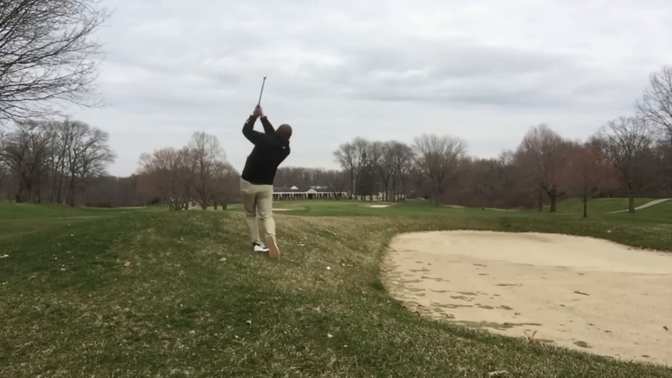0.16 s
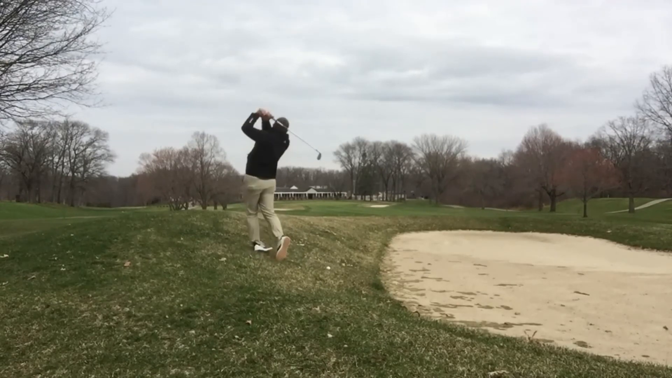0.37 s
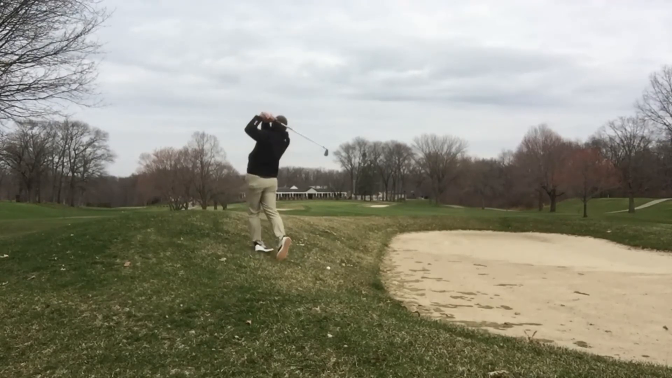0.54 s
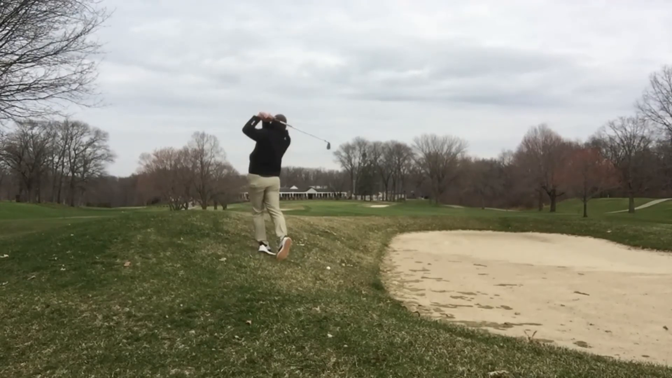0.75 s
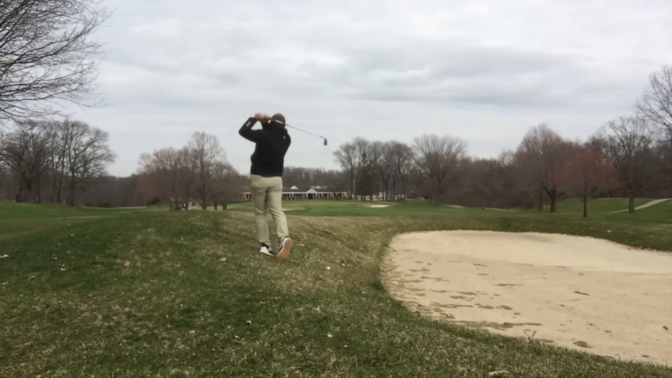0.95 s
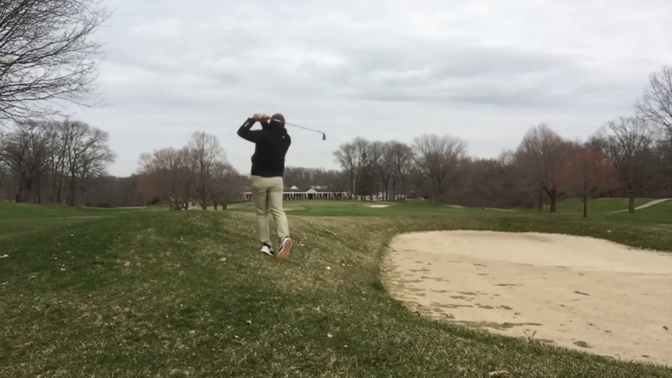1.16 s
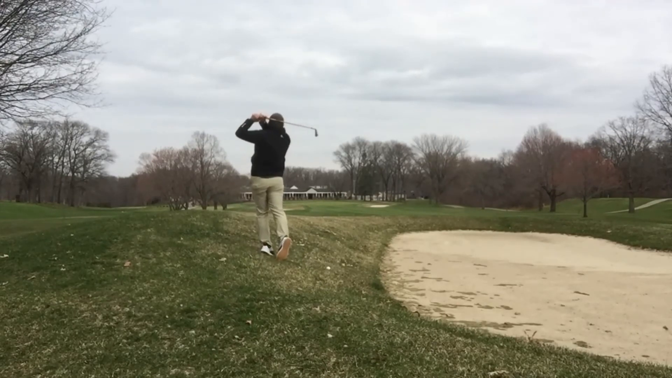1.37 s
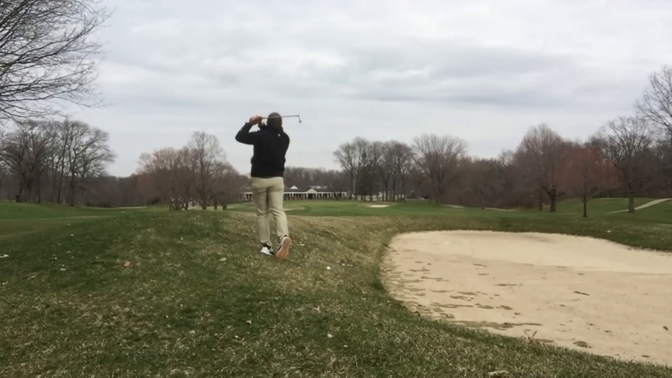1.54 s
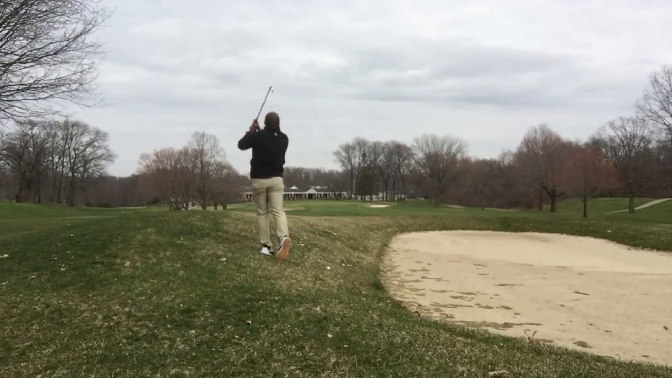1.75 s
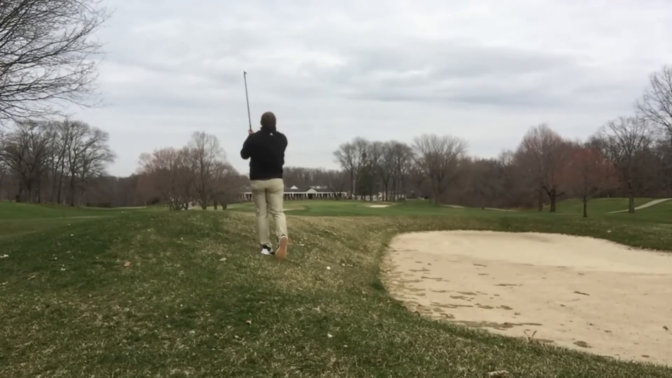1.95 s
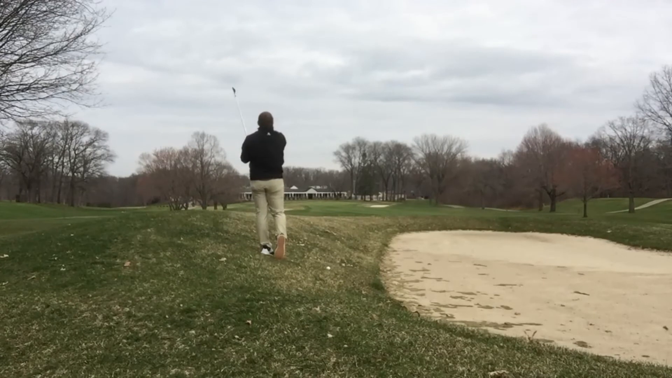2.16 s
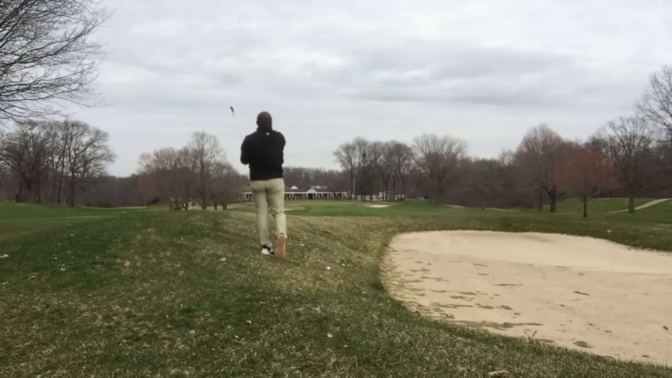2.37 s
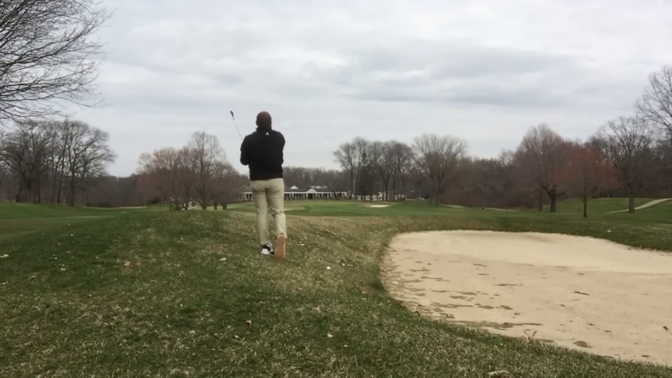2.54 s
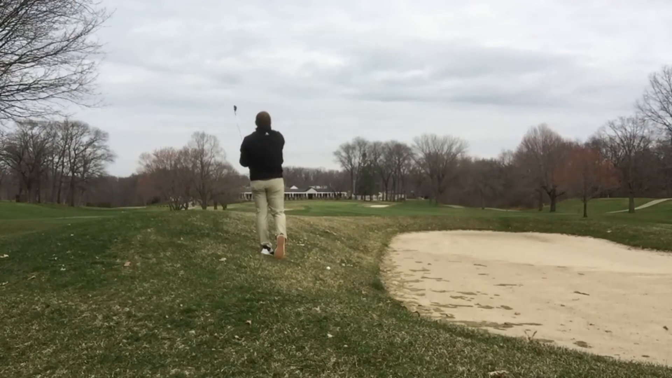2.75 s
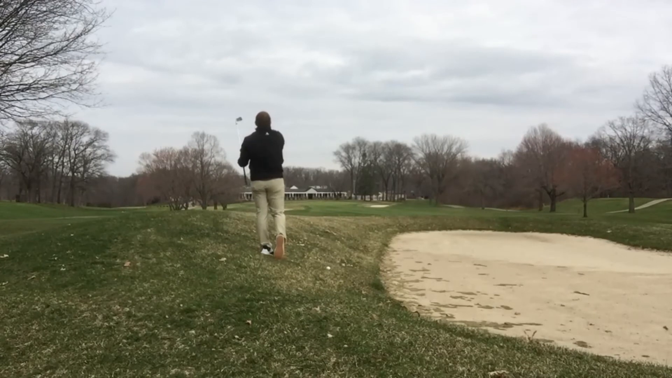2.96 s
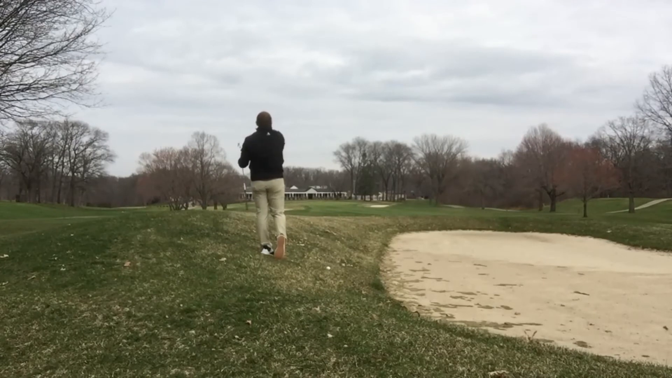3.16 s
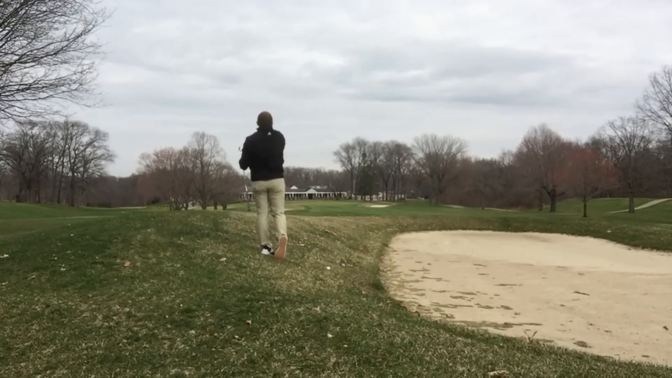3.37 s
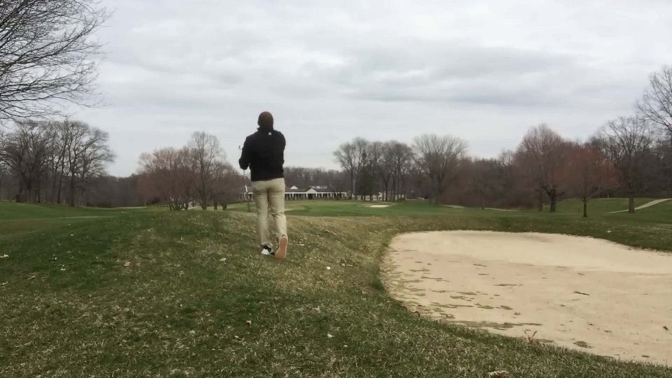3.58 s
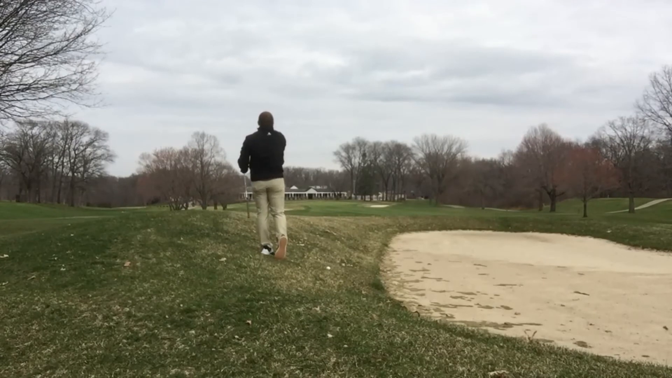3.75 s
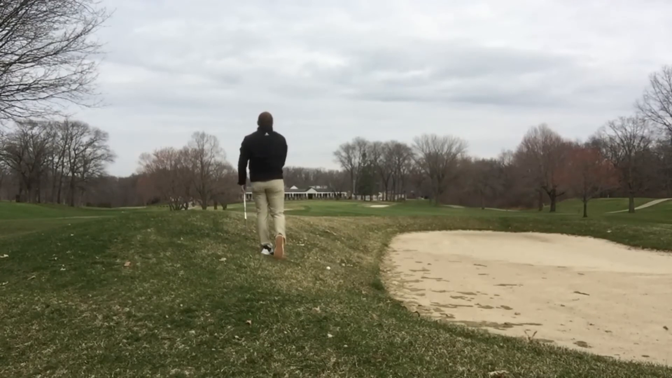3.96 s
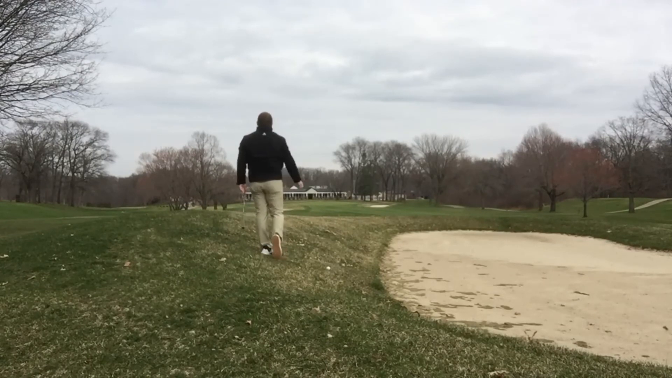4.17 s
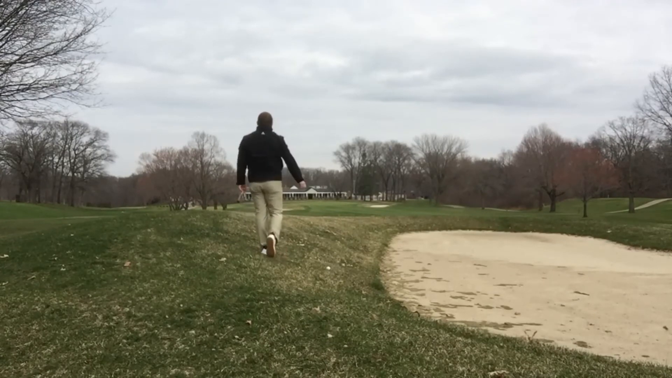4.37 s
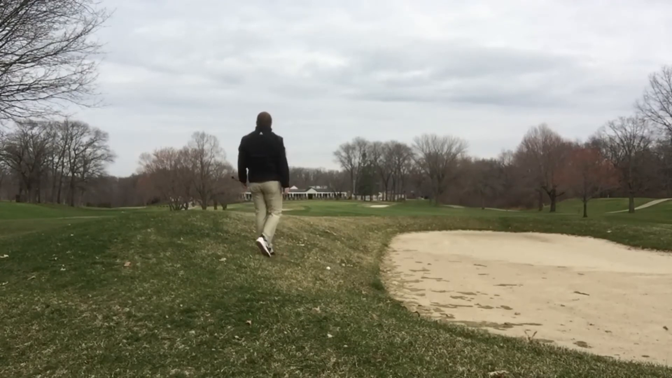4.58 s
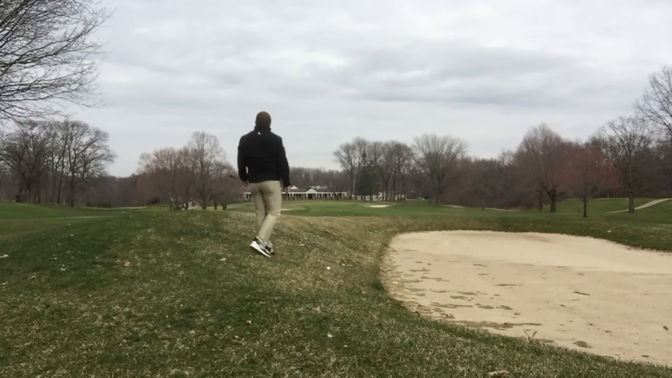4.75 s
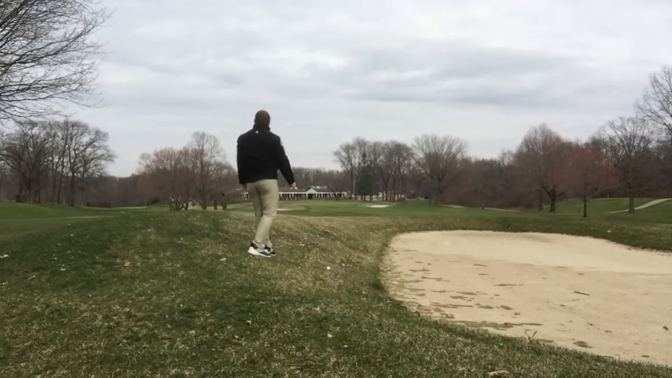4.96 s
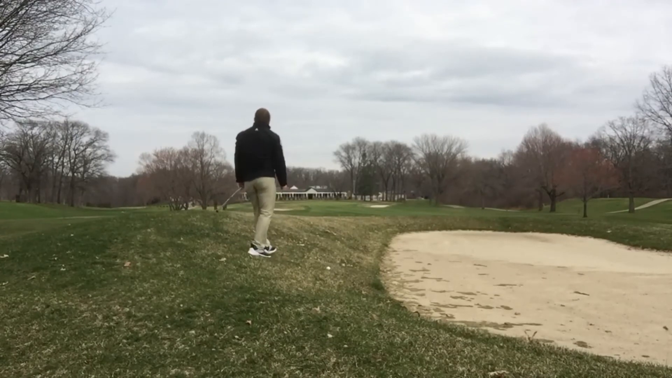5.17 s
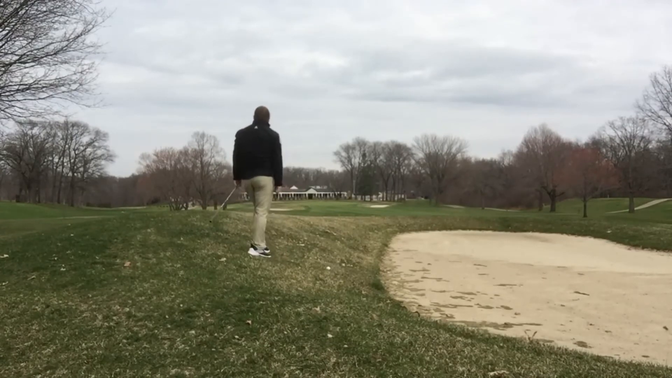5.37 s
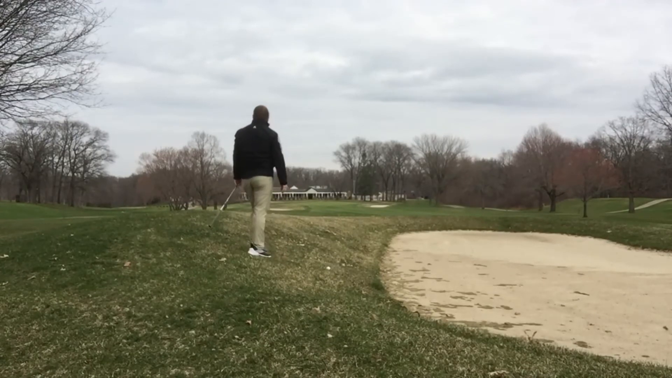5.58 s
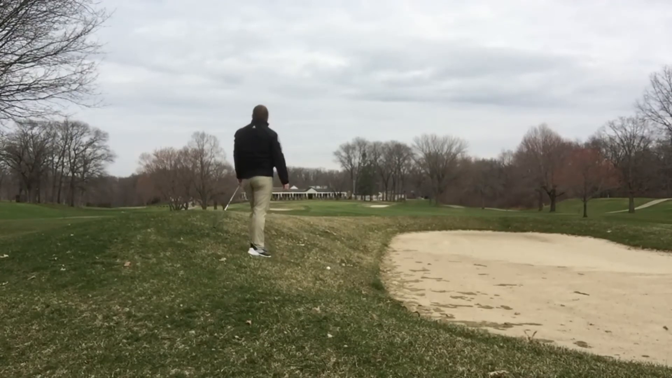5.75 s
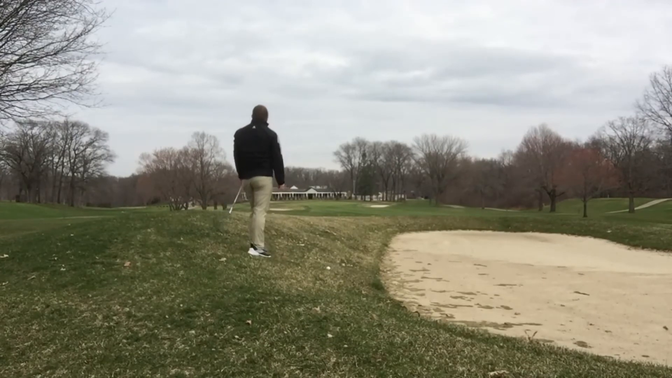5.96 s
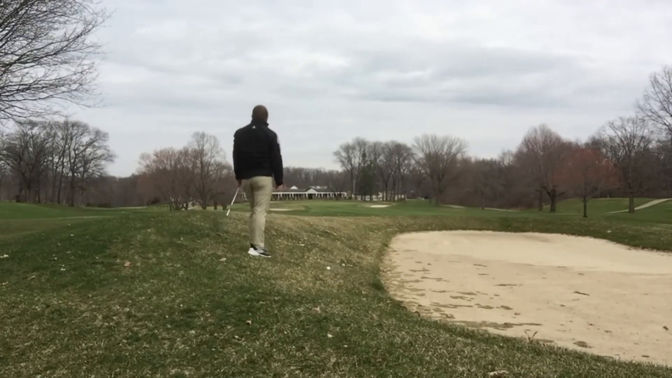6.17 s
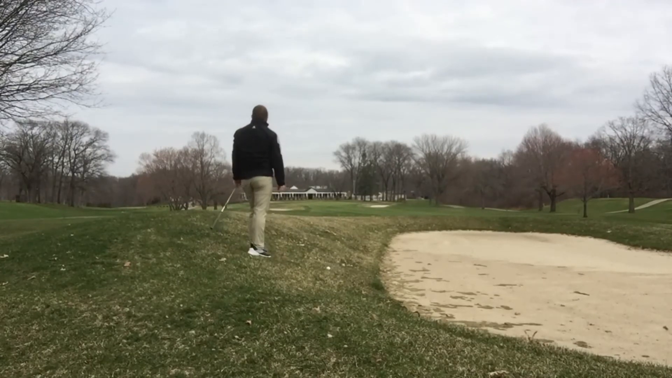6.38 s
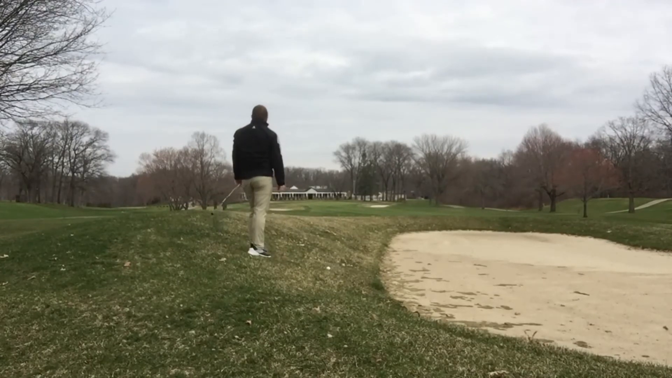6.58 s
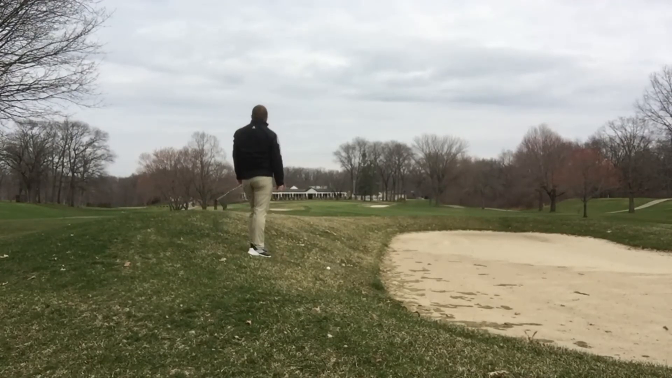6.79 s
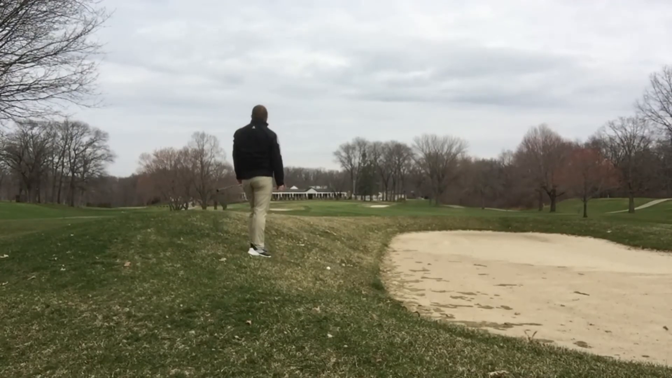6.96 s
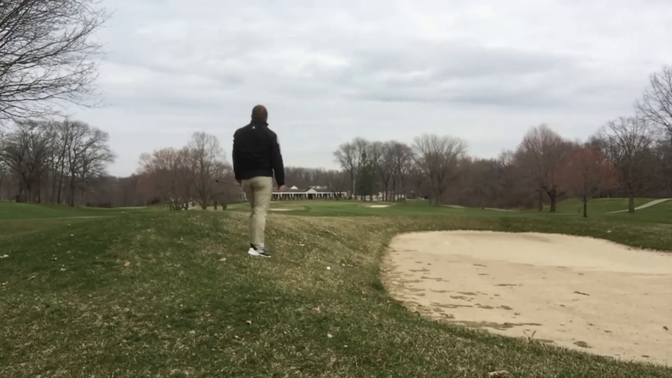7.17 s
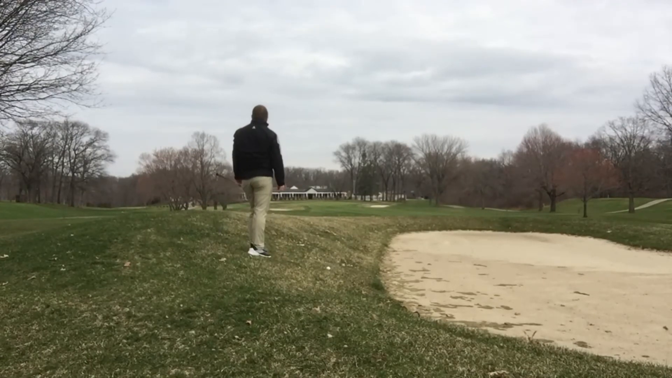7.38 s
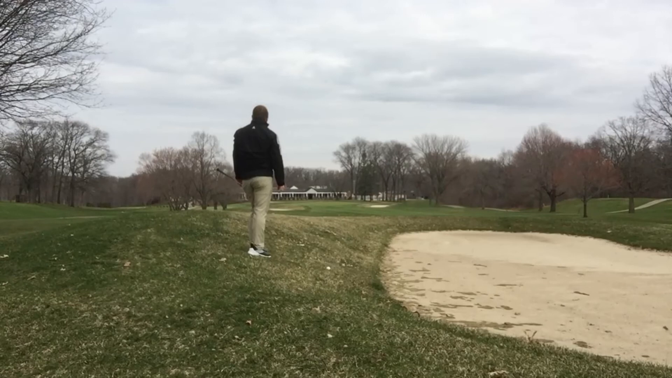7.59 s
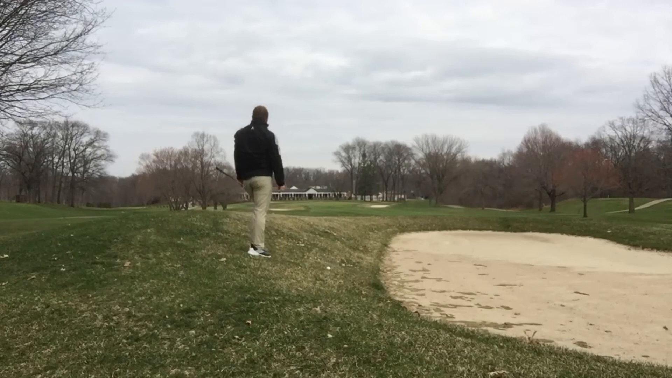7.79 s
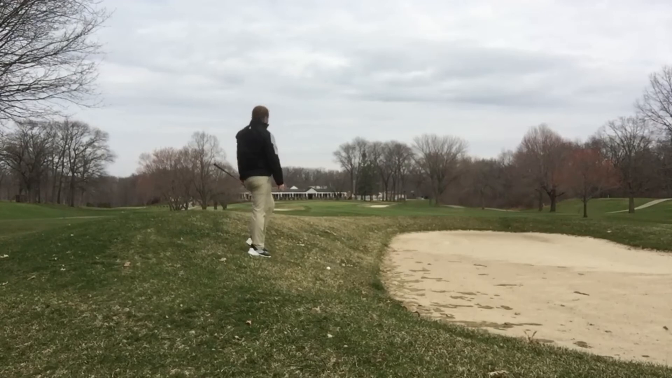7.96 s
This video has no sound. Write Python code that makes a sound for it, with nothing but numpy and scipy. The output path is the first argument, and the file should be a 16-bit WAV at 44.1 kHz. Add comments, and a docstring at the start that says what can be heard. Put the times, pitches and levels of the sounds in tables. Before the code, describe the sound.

One bright metallic golf hit and scattering grass, followed by quick whistled bird phrases echoing from trees amid soft wind thumps and faint hiss.

```python
"""An iron strikes a golf ball on an open course: ringing metal modes, a crack and a scuff of noise.
At once turf and grass spray as gritty noise and scattered ticks, over the strike's long faint tail of noise.
A songbird then repeats short phrases of gliding sines from trees that echo; fainter birds call behind it.
Throughout, light gusts thud, flutter and pop on the single microphone over a far hiss and a wavering hum."""
import sys
import numpy as np
from scipy import signal
from scipy.fft import rfft, irfft, next_fast_len
from scipy.io import wavfile
from scipy.ndimage import uniform_filter1d, map_coordinates

SR = 44100
rng = np.random.default_rng(int(sys.argv[2]) if len(sys.argv) > 2 else 0)


def wav_out(sig):
    """Save sig, one row per channel (or a flat mono array), as 16-bit PCM at SR to the path in sys.argv[1]."""
    wavfile.write(sys.argv[1], SR, np.round(np.clip(np.atleast_2d(sig).T, -1, 1) * 32767).astype(np.int16))


N = 354034


def amp(db):
    """Gain of a level in dB."""
    return 10 ** (np.asarray(db) / 20)


def unit(x):
    """x at rms 1."""
    return x / np.sqrt(np.mean(x ** 2) + 1e-20)


def along(points, hz):
    """Values of (frequency [Hz], value) points, read on a log frequency axis."""
    f, v = np.transpose(points)
    return np.interp(np.log(hz + 1), np.log(f + 1), v)


def curves(rows):
    """One value per sample for each column after the time."""
    s, *columns = np.transpose(rows)
    return [np.interp(np.arange(N) / SR, s, column) for column in columns]


def wobble(rate):
    """A smooth random curve through normal random knots, rate of them a second."""
    knots = rng.standard_normal(int(N * rate / SR) + 4)
    return map_coordinates(knots, [np.arange(N) * rate / SR])


def filtered(x, response):
    """x times a response of frequency."""
    m = next_fast_len(N + SR // 2)
    return irfft(rfft(x, m) * response(np.fft.rfftfreq(m, 1 / SR)), m)[..., :N]


def noise(spectrum):
    """Noise of rms 1, coloured by (frequency [Hz], level per Hz [dB]) points."""
    return unit(filtered(rng.standard_normal(N), lambda hz: amp(along(spectrum, hz))))


def add(track, s, sound):
    """Mix a sound in at time s."""
    part = track[round(s * SR):][:len(sound)]
    part += sound[:len(part)]


def swells(rows):
    """Gain of (middle [s], length [s], peak [dB]) rows: smooth humps, 6 dB down at the ends of their length."""
    out = np.zeros(N)
    for s, length, db in rows:
        t = np.arange(-min(2 * length, s) * SR, 2 * length * SR) / SR
        add(out, s + t[0], amp(db - 6 * (2 * t / length) ** 2))
    return out


def distance():
    """Far noise that wavers gently and swells once in its midrange, with rustles of cloth as noise bursts."""
    # far trees and traffic: (frequency [Hz], level per Hz [dB])
    far_spectrum = [(15, -71.5), (45, -12), (120, -3), (175, -10), (250, -18), (360, -19.5), (500, -27),
                    (1000, -31.5), (2000, -36), (3200, -41.5), (6000, -45.5), (7500, -48), (8800, -46.5),
                    (11000, -49), (15700, -51)]
    # the hiss swells near 1.4 kHz: (middle [s], length [s], level [dB])
    midrange_swell = (5.8, 1, -77)
    # the golfer's jacket: (middle [s], length [s], level [dB])
    rustles = [(4.28, 0.21, -80), (4.42, .1, -84), (4.83, 0.12, -78.5), (5.05, 0.2, -78),
               (5.456, 0.21, -80.5)]
    band_db = -74.5  # mean level of the hiss between 500 and 1400 Hz
    hiss = noise(far_spectrum)
    band = filtered(hiss, lambda hz: (hz > 500) & (hz < 1400))
    steady_hiss = amp(band_db + 0.59 * wobble(6.5)) * hiss / band.std()
    midrange = noise([(700, -120), (1150, -5), (1400, -0.5), (1700, -3), (2800, -120)])
    cloth = noise([(300, -120), (1500, -30.0), (4000, -6.5), (9000, -12.5), (16000, -10.5)])
    cloth *= amp(1.4 * wobble(26))
    return steady_hiss + swells(rustles) * cloth + swells([midrange_swell]) * midrange


def hum():
    """A far machine: two sines, wavering in pitch together, that come and go with the air."""
    # its lines: (frequency before drift [Hz], level before fading [dB])
    lines = [(177, -65.5), (353, -76.5)]
    # as the air carries it: (time [s], level [dB])
    carried = [(0, -12.5), (.7, -4), (1.1, -2), (1.4, 3.5), (2.4, -1.5), (2.95, 5), (3.4, -3), (3.85, 5),
               (6.6, -0.5), (7.4, 0), (8.03, -7.5)]
    drift = 1 + .025 * wobble(10)
    fading_db = curves(carried)[0]
    out = np.zeros(N)
    for hz, db in lines:
        gain = amp(db + fading_db + 4.2 * wobble(11))
        out += np.sqrt(2) * gain * np.sin(2 * np.pi * hz * np.cumsum(drift) / SR)
    return out


def steadied(x, size):
    """x with its slow changes of power evened out over size samples."""
    return x / np.sqrt(np.abs(uniform_filter1d(x * x, size)) + 0.31)


def wind():
    """Eddies thud and flutter in lumps, steadied so that breeze and buffets set the level."""
    # colours of deep and upper eddies: (frequency [Hz], level per Hz [dB])
    thud_spectrum = [(8, -120), (25, -34), (40, -4), (65, 12), (110, 6), (150, -8), (220, -49.5),
                     (500, -120)]
    flutter_spectrum = [(30, -120), (90, -33), (140, 5.5), (200, -3.5), (300, -14.5), (420, -30),
                        (700, -57.5), (1500, -120)]
    # the breeze between buffets: (time [s], thud level [dB], flutter level [dB])
    breeze = [(0.0, -49.5, -57.5), (1.1, -53, -62), (1.56, -58, -52.5), (2.17, -55, -59),
              (2.64, -50, -60.5), (2.86, -57.5, -54), (3.13, -59, -52), (3.62, -50, -54.5),
              (3.93, -50, -60), (4.38, -52.5, -59), (4.74, -50.5, -56.5), (5.01, -48, -72),
              (5.28, -47, -42.5), (5.59, -56, -64), (5.81, -51.5, -53), (6.17, -50.5, -54.5),
              (7.83, -57.5, -68), (8.03, -56, -62)]
    # single buffets on the microphone: (middle [s], length [s], thud level [dB], flutter re thud [dB])
    buffets = [(0.154, 0.019, -40.5, 2.5), (0.189, 0.017, -47, -4), (0.237, 0.01, -48, -4),
               (0.299, 0.035, -40.5, -7), (0.413, 0.016, -36, -23), (0.52, 0.068, -49, -39),
               (0.732, 0.051, -45.5, -8), (0.84, 0.084, -44.5, -17.5), (1.014, 0.048, -45, -10),
               (1.13, 0.047, -43.5, -8), (1.886, 0.042, -39, -13), (2.036, 0.042, -39, -8.5),
               (2.09, 0.0096, -29, -28.5), (2.216, 0.035, -38.5, -13), (2.315, 0.024, -40.5, -9),
               (2.392, 0.017, -38.5, -8), (2.502, 0.035, -31.5, -16), (2.567, 0.011, -36.5, -10),
               (2.67, 0.078, -40.5, -10), (2.786, 0.064, -45.5, -9), (3.028, 0.03, -46, -6.5),
               (3.169, 0.098, -41, -23), (3.513, 0.012, -30, -32.5), (3.994, 0.043, -43, -5.5),
               (4.081, 0.023, -41.5, -20), (4.264, 0.03, -36.5, -5.5), (4.34, 0.024, -41.5, 0),
               (4.575, 0.044, -37.5, 1.5), (4.712, 0.055, -45.5, -5), (4.766, .012, -42, 2.5),
               (4.838, 0.04, -36.5, -6), (4.892, 0.013, -38, -2.5), (4.996, 0.024, -41, -3),
               (5.136, 0.029, -34, 2.5), (5.281, 0.035, -37.5, 1.5), (5.325, 0.042, -39, -8.5),
               (5.41, 0.074, -40, -5), (5.635, 0.031, -35.5, -11.5), (6.188, 0.016, -42, 5.5),
               (6.335, 0.019, -41, 5), (6.45, 0.044, -41, -14), (6.516, 0.019, -40, -11),
               (6.702, 0.025, -37, -4.5), (6.776, 0.026, -44.5, -3), (6.924, 0.03, -45.5, -9),
               (7.062, 0.049, -38, -7.5), (7.168, 0.063, -49, 2), (7.237, 0.015, -45.5, -2.5),
               (7.49, 0.027, -47, 8.5), (7.535, 0.033, -52.5, 5), (7.62, 0.037, -39.5, 2.5),
               (7.852, 0.026, -43, -0.5), (7.904, 0.015, -41.5, -1.5), (7.986, 0.0096, -48.5, 5)]
    lumps_depth_db, lumps_per_s = 4.5, 14  # small random buffets on the breeze
    thud_db, flutter_db = curves(breeze)
    lumps_db = lumps_depth_db * wobble(lumps_per_s)
    thud_buffets = [(s, length, db) for s, length, db, _ in buffets]
    flutter_buffets = [(s, length, db + rel_db) for s, length, db, rel_db in buffets]
    thud_gain = amp(thud_db + lumps_db) + swells(thud_buffets)
    flutter_gain = amp(flutter_db + lumps_db) + swells(flutter_buffets)
    thud = steadied(noise(thud_spectrum) * amp(2.3 * wobble(26)), size=3500)
    flutter = steadied(noise(flutter_spectrum) * amp(11.0 * np.tanh(wobble(35))), size=2000)
    return thud_gain * thud + flutter_gain * flutter


def pops():
    """Each pop is a short kick sinking in pitch, then a low push, in rough air; the port's foam dulls it."""
    # sharp eddies popping on the port: (time [s], kick level before the foam [dB], starting pitch [Hz])
    eddies = [(0.149, -46, 385), (.269, -48, 328), (.374, -44, 610), (0.3812, -28.5, 979),
              (2.379, -47, 260), (2.467, -39.5, 234), (4.259, -44.5, 472), (4.56, -39, 518),
              (4.577, -40, 626), (4.842, -43, 478), (5.091, -41, 400), (5.103, -32.5, 528),
              (5.133, -42, 380), (5.175, -47, 490), (5.2588, -28.5, 704), (5.276, -37, 600),
              (5.323, -40, 540), (5.3704, -30.5, 786), (5.39, -44.5, 553), (5.476, -48.5, 680),
              (6.179, -47.5, 477), (6.34, -42, 525), (6.447, -49, 405), (7.098, -44, 494),
              (7.166, -42.5, 430), (7.188, -42, 386), (7.588, -43.5, 420), (7.62, -37.5, 397)]
    kick_cycles, sink = 1.2, 0.76  # half length of the kick in cycles; share of pitch lost over it
    push_db = -8  # start of the low push re the kick
    crumble_db, crumble_s = -24, 0.026  # rough air: level re a kick that starts at 700 Hz, length
    out, t = np.zeros(N), np.arange(SR // 15) / SR
    for s, db, hz in eddies:
        u = (t - .004) * hz / kick_cycles
        sinking = hz * (1 - sink / (1 + np.exp(-2 * u)))
        phase = 2 * np.pi * np.cumsum(sinking) / SR + rng.uniform(0, 2 * np.pi)
        kick = np.exp(-u ** 2) * np.sin(phase)
        after = np.maximum(t - .005, 0)
        push = amp(push_db - 60 * after / 0.046) * np.sin(2 * np.pi * 150 * after)
        add(out, s - .002, amp(db) * (kick + push))
    rough = noise([(60, -120), (200, 6.0), (400, -7), (700, -8.0), (1200, -36), (4000, -120)])
    rough *= amp(2.9 * wobble(150))
    # higher pops crumble louder
    crumbles = [(s + 0.0079, crumble_s, db + crumble_db + 20 * np.log10(hz / 700)) for s, db, hz in eddies]
    out += rough * swells(crumbles)
    return filtered(out, lambda hz: 1 / (1 + (hz / 1500) ** 4))


def note(shape, pitch, length):
    """A whistled sine along a smoothed (time [s], pitch [Hz], level [dB]) shape, with soft ends."""
    s, hz, db = np.transpose(shape)
    s = (s - s[0]) * length
    t = np.arange(int(s[-1] * SR)) / SR
    ends = np.clip(np.minimum(t / 0.00056, (t[-1] - t) / 0.0034), 0, 1)
    glide = uniform_filter1d(np.interp(t, s, np.log(hz)), len(t) // 16 + 1, mode="nearest")
    phase = 2 * np.pi * np.cumsum(pitch * np.exp(glide)) / SR
    return np.sqrt(2) * ends * amp(np.interp(t, s, db)) * np.sin(phase)


def whistles():
    """Lone gliding sines, dry: far birds' calls and a few of the songbird's rising notes; single whistles also
    start and end softly."""
    # single whistles, of far birds and a few of the songbird's lifts: (time [s], length before a 0.86
    # shortening [s], first, middle and last pitch [Hz], starting level [dB], level change to the end [dB])
    singles = [(0.168, 0.09, 3650, 3230, 3000, -62, -8.5), (0.804, 0.028, 3300, 3320, 3280, -75, -5),
               (1.807, 0.034, 7920, 7720, 7500, -79, -1), (2.142, .025, 7870, 7670, 7430, -81, 0),
               (2.399, 0.048, 2240, 2470, 2600, -68.5, 13.5), (3.724, 0.063, 4080, 4140, 4140, -79.5, 0),
               (3.915, 0.17, 4450, 4590, 4760, -71, -7.5), (4.005, 0.035, 2700, 2880, 3000, -74, 0),
               (4.13, 0.024, 4300, 4300, 4300, -74, -1), (4.36, 0.07, 5700, 4960, 4270, -78, -4),
               (4.436, 0.108, 4050, 3850, 3800, -78, 1.5), (4.504, 0.0081, 3860, 3100, 2486, -66, 2),
               (4.825, .18, 4030, 4010, 4140, -77, -5), (4.934, 0.15, 3400, 3470, 3550, -82.5, 2),
               (6, 0.02, 4130, 4240, 4260, -70, 3), (6.048, 0.062, 6030, 5390, 5060, -82, 12),
               (6.41, 0.04, 5640, 5400, 5100, -82, -3)]
    # one bird's series of eight falling ticks: (time [s], pitch [Hz], level [dB]), before pitch and length factors
    tsip = [(0, 7100, 0), (.008, 6370, -1), (.018, 5800, -1)]
    # a rising tick follows each: (time [s], pitch [Hz], level [dB]), before pitch and length factors
    tup = [(0, 4330, -5), (.008, 4770, 1), (.016, 5050, 0)]
    series_s, gap_s, tup_late_s = .534, 0.0878, 0.036  # start, spacing, delay of the rising tick
    tsip_db, tup_db = -77.5, -84  # falling tick at its loudest (the fifth), first rising tick, before scatter
    out = np.zeros(N)
    for s, length, first, middle, last, db, change in singles:
        shape = [(0, first, db), (length / 2, middle, db + change / 2), (length, last, db + change)]
        tone = note(shape, 1, 0.86)
        add(out, s, tone * signal.windows.tukey(len(tone), .3))
    for k, (a, b) in enumerate(rng.standard_normal((8, 2))):
        s = series_s + k * gap_s
        tsip_gain = amp(tsip_db + 1.5 * a - 0.37 * (k - 4) ** 2)
        add(out, s, tsip_gain * note(tsip, .97 + .012 * b, 0.85))
        tup_gain = amp(tup_db + 0.61 * k + 2 * b)
        add(out, s + tup_late_s, tup_gain * note(tup, 1 + .012 * a, 0.97))
    return out


def birds():
    """The songbird's repeated notes, dry: sines that glide along a shape per kind of note."""
    # Each kind has a shape: (time [s], pitch [Hz], level [dB]), before the factors of its singings,
    # then its singings: (time [s], level [dB], pitch factor, length factor).
    # the first two slurs, which fall from the start without rising first: shape, singings as above
    fall_shape = [(0, 2496, -17), (.015, 2460, -4), (.04, 2380, 0.5), (.07, 2150, 3), (.1, 1900, 5),
                  (.13, 1765, -7), (.17, 1710, -16)]
    falls = [(0.635, -75, 1, 0.93), (1.008, -67, 0.99, 1)]
    # slurs, bent anew each time: singings add pitch factors of the shape's points from the fourth on
    slur_shape = [(0, 2270, -13), (.02, 2343, -5.5), (.045, 2387, 1), (.07, 2178, 1.5), (.095, 1900, 1.5),
                  (.125, 1741, -9), (.18, 1696, -19.5)]
    slurs = [(1.383, -62.5, 1, 1, 0.95, 0.99), (1.732, -60.5, 0.98, 0.98, .97, 1.02),
             (2.07, -59.5, 0.97, 0.92, 1, 1.03), (6.515, -63.5, 1.013, 1.03, 0.96, 1.01),
             (6.887, -61.5, 1.01, 1.03, .95, 1.01), (7.253, -61, 0.99, 0.91, 1.01, 1.03),
             (7.599, -63.5, 0.98, 0.97, 1.01, 0.96)]
    # dives, bent likewise: singings add one pitch factor, of the fourth point
    dive_shape = [(0, 5000, -19), (.004, 4230, 2), (.008, 3870, 4.5), (.02, 3600, 3.5), (.038, 2860, -0.5)]
    dives = [(2.451, -60, 1, 0.93, 1.01), (2.769, -63, 1.01, 1.1, .98), (3.124, -62, 1.01, 1.02, .97)]
    # chups, quick plunges to a flat end: shape, singings as above
    chup_shape = [(0, 5000, -18), (.003, 4190, -6.5), (.009, 3420, 5), (.02, 3330, 1.5), (.04, 3256, -8)]
    chups = [(.381, -64, 0.98, 1), (0.835, -65, 1.04, 0.74), (3.78, -74.5, 0.95, 0.55),
             (4.041, -66, 0.97, 0.66), (4.302, -61, 0.99, 1), (4.56, -61, .94, 1.1),
             (4.801, -62, 1.026, 1.06), (5.058, -58.5, 1.01, 0.99)]
    # brief lifts: shape, singings as above
    lift_shape = [(0, 2350, -15), (.007, 2530, -1.5), (.016, 2570, -2), (.03, 2640, -31)]
    lifts = [(2.727, -55.5, 1.03, 1.2), (3.085, -58.5, 1, 1.03), (4.27, -72, 1.1, 0.73),
             (4.529, -57.5, 1.06, 0.53), (4.767, -60, 1.17, 1.37), (5.022, -65, 1.1, 0.96),
             (5.262, -66, 0.96, 0.97), (5.513, -71, .955, 0.88), (5.79, -69, 0.97, 0.64),
             (5.949, -74, 0.93, 1.3), (6.074, -70.5, 1.02, 0.52), (6.318, -77, 1.1, .6)]
    # low drops: shape, singings as above
    drop_shape = [(0, 1776, -5), (0.015, 1840, 2.5), (0.03, 1650.0, -8.5), (0.055, 1490, -9)]
    drops = [(2.543, -66, 0.99, 0.99), (2.859, -64.5, 1, 0.8), (3.217, -68.5, 0.96, 1)]
    # arches, up and then far down: shape, singings as above
    arch_shape = [(0, 2040, -14), (0.025, 2400, 3), (0.04, 2104, -4), (0.053, 1720, -6.5),
                  (0.068, 1530, -13.5), (0.09, 1430, -13)]
    arches = [(3.898, -75.5, 0.97, 0.94), (4.156, -68.5, 0.98, 1.03), (4.415, -66.5, 0.96, 1.05),
              (4.648, -63.5, 0.97, .92), (4.908, -64, 0.96, 1.13)]
    # rising notes: shape, singings as above
    rise_shape = [(0, 1757, -6), (.035, 1950, -8.5), (.07, 2250, -4.5), (.11, 2280, -8.5)]
    rises = [(4.79, -65.5, 0.99, 0.95), (5.165, -68, 0.96, 0.61), (5.5, -73, 0.99, 1.1),
             (5.86, -71, 0.97, 1.1), (6.225, -69, 0.99, 1.13)]
    # slides from high to a level end: shape, singings as above
    slide_shape = [(0, 4860, -17), (.004, 4040, -3), (.007, 3690, -1), (.02, 3575, 2.5), (.037, 3087, -4),
                   (.048, 2990, -1), (.062, 2960, -8)]
    slides = [(5.293, -59, 1.02, 1.07), (5.542, -61, 1.024, 0.77), (5.824, -61, 1.013, 0.78),
              (5.985, -65.5, 1.09, 0.39), (6.103, -62, .97, 0.66), (6.358, -64.5, 1.08, 0.47)]
    # a short flat pip announces each chip: (time [s], pitch [Hz], level [dB])
    pip_shape = [(0, 2950, -19), (.004, 3310, -3.5), (.013, 3300, -1.5), (0.024, 3230, -14)]
    # a chip plunges to a knee, swelling, then sags: (time before shortening [s], pitch re the knee, level [dB])
    plunge = [(0, 1.75, -26), (.004, 1.22, -9.5), (.0055, 1.102, 1), (.008, 1, 2)]
    # chips: (time [s], level [dB], knee pitch [Hz], end pitch [Hz], sag before shortening [s], pip level [dB])
    chips = [(1.227, -61.5, 4030, 3650, 0.02, -64.5), (1.597, -62, 3820, 3600, .028, -62.5),
             (1.944, -59, 4280, 3630, 0.015, -62), (2.286, -59.5, 4140, 3600, 0.016, -57.5),
             (6.731, -60, 3840, 3570, 0.02, -64), (7.11, -64, 4060, 3570, 0.0246, -63.5),
             (7.466, -60.5, 3990, 3550, 0.026, -61.5), (7.814, -64, 4090, 3670, .016, -64.5)]
    pip_lead_s = 0.03  # before its chip
    sag_early, sag_end_db, chip_length = .75, -6, 0.95  # share of the sag by halfway; end level; shortening
    pips = [(s - pip_lead_s, db, 1, 1) for s, *_, db in chips]
    kinds = [(slur_shape, slurs), (pip_shape, pips), (chup_shape, chups), (dive_shape, dives),
             (slide_shape, slides), (lift_shape, lifts), (drop_shape, drops), (arch_shape, arches),
             (rise_shape, rises), (fall_shape, falls)]
    out = np.zeros(N)
    for shape, singings in kinds:
        for s, db, pitch, length, *bends in singings:
            bent = np.array(shape, float)
            bent[3:3 + len(bends), 1] *= bends
            add(out, s, amp(db) * note(bent, pitch, length))
    for s, db, knee, end, sag, _ in chips:
        knee_s, ratio = plunge[-1][0], end / knee
        sagging = [(knee_s + sag / 2, ratio ** sag_early, 0), (knee_s + sag, ratio, sag_end_db)]
        add(out, s, amp(db) * note(plunge + sagging, knee, chip_length))
    return out


def trees(x):
    """Scattered echo of decaying noise; moving leaves make it new every third of a second."""
    # decay of the tree line's echo: (frequency [Hz], time to fall 60 dB [s])
    decay = [(1500, 0.26), (2300, 0.4), (3500, 0.29), (7000, 0.22)]
    patchy_db = 2.5  # single trees stand out of the echo
    out, step = np.zeros(N), SR // 3
    for start in range(0, N, step):
        hz, t, z = signal.stft(rng.standard_normal(SR // 2), SR, nperseg=256)
        rise = 1 - np.exp(-t / 0.0026)
        patches = uniform_filter1d(rng.standard_normal(z.shape), size=4, axis=0)
        patches = unit(uniform_filter1d(patches, size=4, axis=1))
        level_db = patchy_db * patches - 60 * t / along(decay, hz)[:, None]
        tail = signal.istft(z * rise * amp(level_db), SR, nperseg=256)[1]
        add(out, start / SR, signal.fftconvolve(x[start:start + step], tail / np.linalg.norm(tail)))
    return out


def grains(strike_s):
    """Bits of turf ticking through the grass: short decaying sines, thinning out after the strike."""
    level_db, t60_s = -58, .45  # level of the smallest bit at the strike; fall of the levels with time
    out, t = np.zeros(N), np.arange(SR // 200) / SR
    for when, pitch, size in rng.random((90, 3)):
        after = .006 - .09 * np.log(1 - when)
        hz = 1200 * 5.5 ** pitch
        tick = np.sin(2 * np.pi * hz * t) * np.exp(-t * hz / 2.3)
        gain = amp(level_db - 2.3 * np.log(1 - size) - 60 * after / t60_s)
        add(out, strike_s + after, gain * tick)
    return out


def pass_by(t, db, rise, fall):
    """Gain that peaks at t = 0, rising to it and falling from it at steady rates in dB per s."""
    return amp(db - np.where(t < 0, -rise * t, fall * t))


def swish(strike_s):
    """Noise of air torn by the shaft, a gritty spray of turf that swells and settles, and a long faint tail."""
    spray_db, spray_peak_s = -60.5, .075  # flying turf: treble at its loudest, and when after the strike
    body_db = -9  # the spray's body re its treble
    tail_db, tail_t60_s = -67.5, 2.7  # the strike's long faint tail, its echo over the course
    clod = (.115, .006, -53.5)  # the divot bursts apart: middle [s], length [s], level [dB]
    t = np.arange(N) / SR - strike_s
    after = np.maximum(t, 0)
    u = after / spray_peak_s
    turf = amp(spray_db) * u * np.exp((1 - u ** 1.5) / 1.5) + swells([clod])
    tail = (t > 0) * amp(tail_db - 60 * after / tail_t60_s)
    spray = noise([(400, -120), (1500, -27.0), (3000, 2.5), (5500, 0.5), (8000, -4.5), (16000, -7)])
    spray *= amp(2.2 * wobble(70) + 1.6 * wobble(340))  # grit
    body = noise([(100, -120), (300, -2.0), (600, -1), (1500, -6.0), (2500, -9.5), (4000, -7.0), (9000, -120)])
    # the shaft's whoosh peaks at the strike; its treble rises faster
    treble_gain = pass_by(t, -53, rise=337, fall=109.5) + turf
    body_gain = pass_by(t, -51, rise=194.5, fall=200) + amp(body_db) * turf + tail
    return treble_gain * unit(spray) + body_gain * body


def strike(strike_s):
    """The sole scuffs the turf, then noise cracks at contact and the head's modes ring as decaying sines."""
    # club head and ball: (frequency [Hz], level before build-up [dB], time to fall 60 dB [s])
    modes = [(710, -27.5, 0.029), (1000, -37, 0.025), (1262, -33, 0.031), (2280, -34, .012),
             (3040, -19.5, 0.016), (3900, -23.5, 0.01), (4550, -21.5, .012), (5033, -24.5, 0.018),
             (6060, -25, 0.012), (9640, -21.5, 0.0058), (11400, -24.5, 0.0078), (11850, -21, .007),
             (13460, -16.5, 0.0049), (15350, -18, 0.0063)]
    out, t = np.zeros(N), np.arange(SR // 8) / SR
    ring = np.zeros(len(t))
    for hz, db, t60 in modes:
        build_up = 1 - np.exp(-t * hz / 0.38)
        ring += amp(db - 60 * t / t60) * np.sin(2 * np.pi * hz * t + rng.uniform(0, 2 * np.pi)) * build_up
    bright_noise = np.diff(rng.standard_normal(len(t) + 1))
    contact = amp(-23.5) * np.exp(-(t / 0.00037) ** 4) * bright_noise  # ball pressed on the face
    grit = (amp(-23 - 60 * t / 0.011) + amp(-32 - 60 * t / 0.04)) * rng.standard_normal(len(t))
    add(out, strike_s, ring + contact + grit)
    scuff_t = t[:130]  # the last 3 ms before contact
    scuff = amp(-38.0) * np.sin(2 * np.pi * 620 * scuff_t) + amp(-46.5) * rng.standard_normal(130)
    add(out, strike_s - 130 / SR, scuff)
    return out


def scene():
    """Everything at one microphone; moving air makes the birds flicker."""
    # two nearer trees answer distinctly: (delay [s], level before the twigs' colour [dB])
    trunks = [(.035, -32), (.075, -21)]
    # twigs colour the echo: (frequency [Hz], level [dB])
    twigs = [(1400, -3.5), (2000, -9.5), (2600, -5), (3500, -3.5), (6000, -1.5)]
    strike_s = .0598
    far_echo_db = -6.5  # the far whistlers sit in the open
    near, far = np.array([birds(), whistles()]) * amp(1.66 * wobble(60))
    far = far * amp(2.8 * wobble(35))  # the longer path flickers more
    song = near + amp(far_echo_db) * far
    echoes = trees(song)
    for delay_s, db in trunks:
        echoes = echoes + amp(db) * np.roll(song, round(delay_s * SR))
    echoes = filtered(echoes, lambda hz: amp(along(twigs, hz)))
    background = distance() + hum() + wind() + pops()
    shot = strike(strike_s) + swish(strike_s) + grains(strike_s)
    return (background + near + far + echoes + shot)[None]


def record(dry):
    """The microphone loses the deepest bass; the recorder rounds off high peaks and cuts the top."""
    low_cut_hz, top_hz = 35, 15750
    ceiling = .27  # peaks are rounded off near this size
    thin = filtered(dry, lambda hz: hz ** 4 / (hz ** 4 + low_cut_hz ** 4))
    rounded = thin / (1 + np.abs(thin / ceiling) ** 4) ** (1 / 4)
    return filtered(rounded, lambda hz: hz < top_hz)


dry = scene()
out = record(dry)
wav_out(out)
```